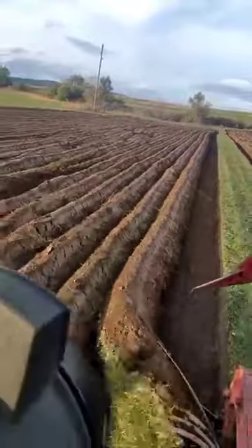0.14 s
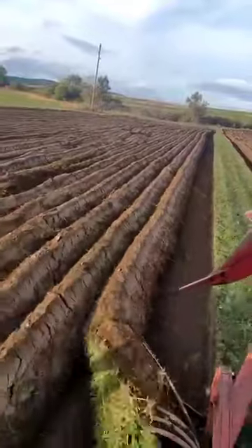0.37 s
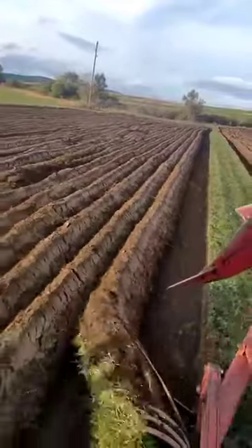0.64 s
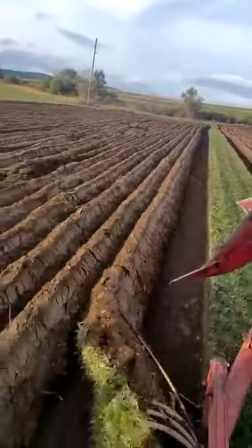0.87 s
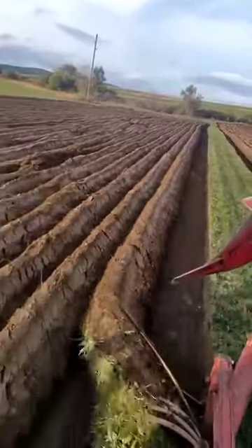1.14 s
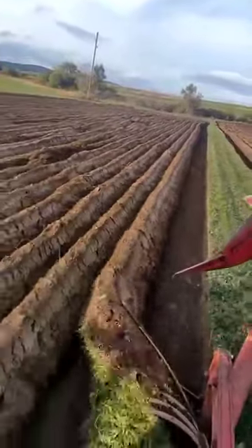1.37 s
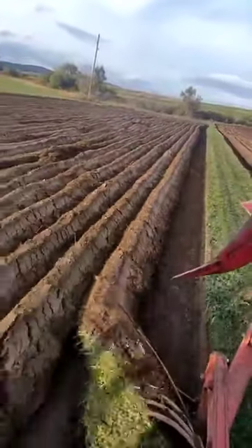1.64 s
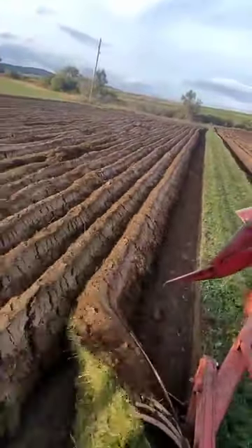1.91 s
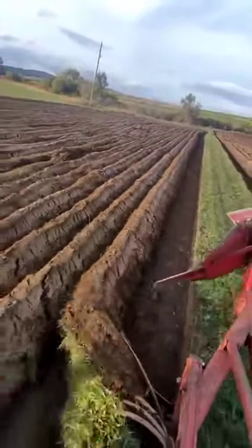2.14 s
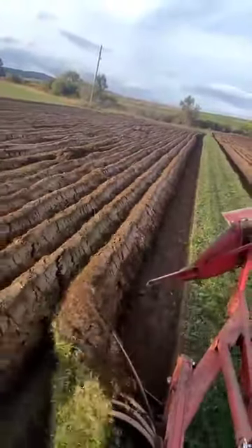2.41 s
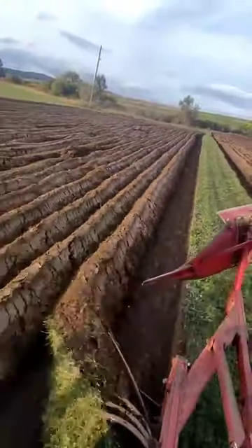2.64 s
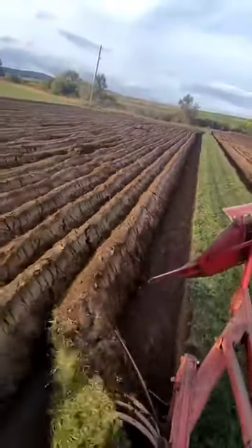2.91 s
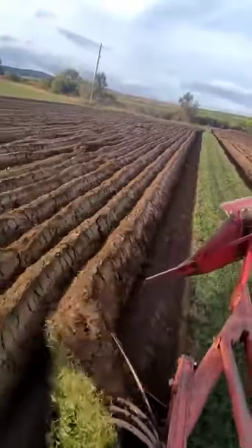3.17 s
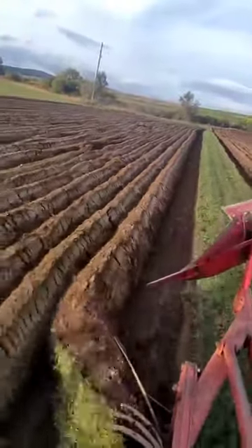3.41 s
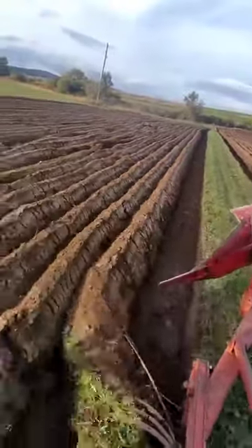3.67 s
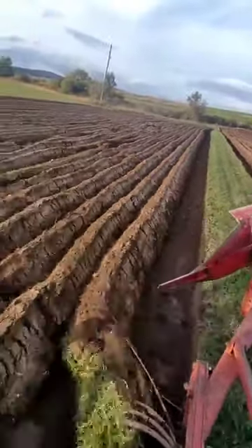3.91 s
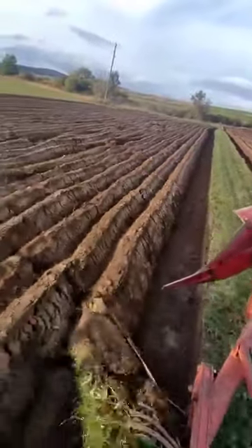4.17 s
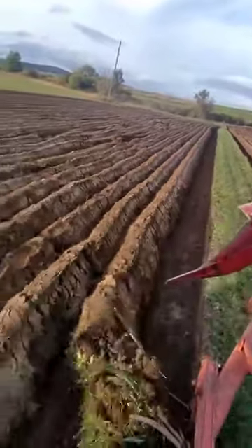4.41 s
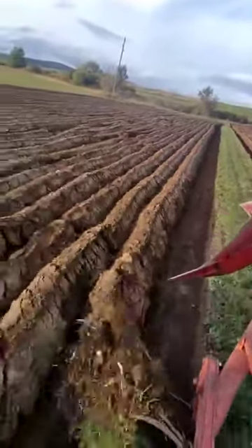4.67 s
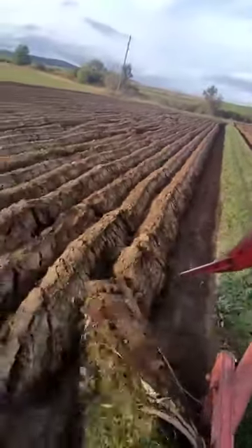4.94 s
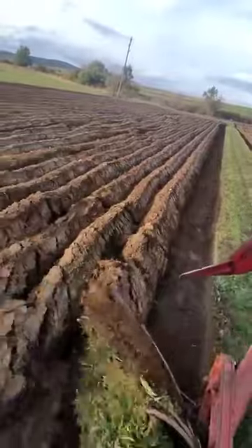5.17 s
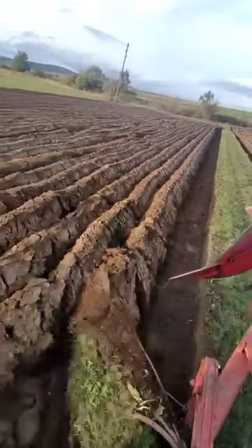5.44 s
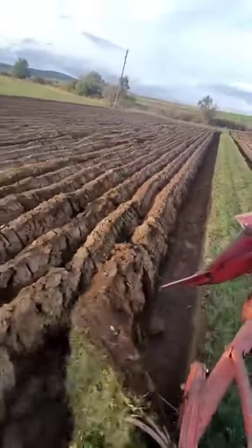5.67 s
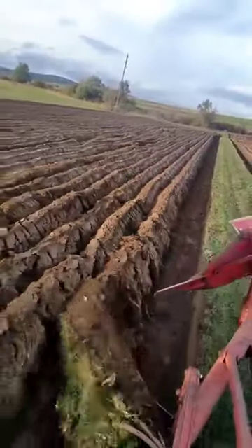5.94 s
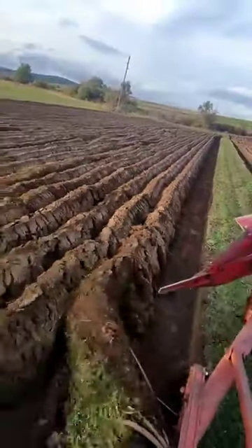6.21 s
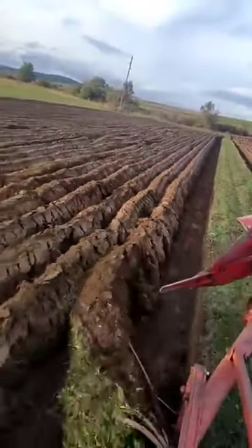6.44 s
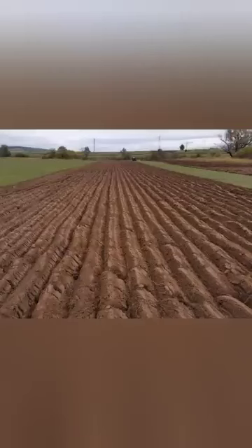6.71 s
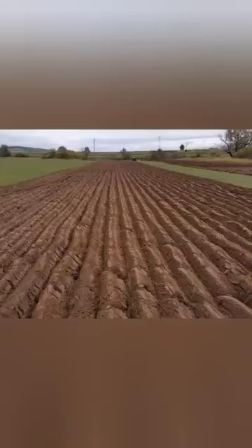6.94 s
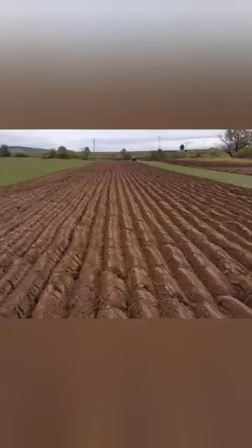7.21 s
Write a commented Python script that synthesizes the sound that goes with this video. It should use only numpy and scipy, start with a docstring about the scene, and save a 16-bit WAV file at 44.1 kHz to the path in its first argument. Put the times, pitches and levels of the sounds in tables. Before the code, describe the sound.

Close on board a tractor pulling a plough across an open field, a three-cylinder diesel runs at constant fast speed with a deep, even throb and repeating clatter. Gear whine wavers on top, valve knocks ring thin metal, and a loose sheet rattles in uneven bursts. Fan air, tyres and turning soil blend into dense, wide stereo rushing. Near the end the sound cuts instantly to silence.

```python
"""At the driver's seat of a three-cylinder diesel tractor, pulling a plough at steady load, heard at two ports.
The exhaust throbs and gears whine as tones locked to the crankshaft; the block repeats one clatter every cycle.
Short noise bursts knock on ringing tinwork, and resonated noise makes a loose sheet rattle in spells.
Patchy noise in three bands is the rush of fan air, tyres and turning soil, until the sound is cut off."""
import sys
import numpy as np
from scipy import signal
from scipy.fft import rfft, irfft, next_fast_len
from scipy.io import wavfile
from scipy.ndimage import uniform_filter1d, map_coordinates

SR = 44100
rng = np.random.default_rng(int(sys.argv[2]) if len(sys.argv) > 2 else 0)


def generate_wav(sig):
    """Save sig (samples, or channels by samples) to the path in sys.argv[1] as 16-bit PCM at SR."""
    pcm = np.round(np.clip(np.atleast_2d(sig).T, -1, 1) * 32767).astype(np.int16)
    wavfile.write(sys.argv[1], SR, pcm)


def convert_level_to_amplitude(level_db):
    """Map a level in decibels to its linear amplitude factor."""
    exponent = np.asarray(level_db, float) / 20
    return 10 ** exponent


N = 323253
LEFT_RIGHT = np.array([[1], [-1]])


def unit(x):
    """Scale each channel to rms 1."""
    return x / np.sqrt(np.mean(x ** 2, axis=-1, keepdims=True) + 1e-20)


def along(points, hz, column=1):
    """Read a column of a table over frequency, on a log axis."""
    rows = np.transpose(points)
    return np.interp(np.log(hz + 1), np.log(rows[0] + 1), rows[column])


def curves(rows):
    """Join the dots over time: one value per sample for each column after the time."""
    time_s, *columns = np.transpose(rows)
    return [np.interp(np.arange(N) / SR, time_s, column) for column in columns]


def wobble(knots_per_s):
    """A smooth random curve through normally distributed knots."""
    knots = rng.standard_normal(int(N * knots_per_s / SR) + 4)
    return map_coordinates(knots, [np.arange(N) * knots_per_s / SR])


def swell(events):
    """Bell-shaped rises in dB from rows of centre_s, half_length_s, rise_db."""
    t = np.arange(N) / SR
    return sum(rise_db * np.exp(-((t - centre_s) / half_s) ** 2) for centre_s, half_s, rise_db in events)


def tone(level_db, turns):
    """A cosine of the given rms level; turns is its phase in whole rounds."""
    return np.sqrt(2) * convert_level_to_amplitude(level_db) * np.cos(2 * np.pi * turns)


def filtered(x, response):
    """Filter x by a complex response of frequency, with room for the tail."""
    size = next_fast_len(N + SR // 2)
    hz = np.fft.rfftfreq(size, 1 / SR)
    return irfft(rfft(x, size) * response(hz), size)[..., :N]


def modes(table):
    """Causal response of resonances in alternating polarity: rows of centre_hz, width_hz, level_db."""
    def response(hz):
        total = 0
        for k, (centre_hz, width_hz, level_db) in enumerate(table):
            damping = 1j * hz * width_hz
            total = total + (-1) ** k * convert_level_to_amplitude(level_db) * damping / (centre_hz ** 2 - hz ** 2 + damping)
        return total
    return response


# how alike left and right are; columns: frequency_hz, likeness (0-1)
LIKENESS = [(30, .8), (80, .88), (200, 1), (300, 0.47), (420, 0.42), (650, 0.71), (800, 0.6), (950, 0.16),
            (1700, 0.31), (2200, 0.15), (3000, 0.03), (14000, 0)]


def paired(pair):
    """Mix two noises into a left and right of the set likeness; the left port hears the engine first."""
    lead_s = 0.0002296

    def mid_side(hz):
        angle = np.arccos(np.clip(along(LIKENESS, hz), -1, 1)) / 2
        return np.array([np.cos(angle), np.sin(angle)])

    def early_left(hz):
        return np.exp(1j * np.pi * lead_s * np.outer([1, -1], hz))

    mid, side = filtered(pair, mid_side)
    return filtered(np.array([mid + side, mid - side]), early_left)


# crankshaft speed; columns: time_s, speed_rev_per_min
CRANK_SPEED = [(0.0, 1797.5), (1.11, 1785.8), (1.86, 1797.1), (2.71, 1776.7), (3.02, 1781.3),
               (3.44, 1761.1), (3.75, 1804.5), (4.42, 1796.0), (5.18, 1775.3), (5.74, 1800.9),
               (6.14, 1787.7), (6.7, 1786.2)]


def crankshaft():
    """Running count of four-stroke cycles; each takes two turns of the crank."""
    return np.cumsum(curves(CRANK_SPEED)[0]) / 120 / SR


# harmonics of the exhaust pulse; columns: order (per four-stroke cycle), left_db, right_db (rms)
EXHAUST_ORDERS = [(3, -26, -27), (6, -15.5, -15), (9, -20.5, -19.5), (12, -28, -27.5)]


def exhaust(cycle):
    """Each firing draws one deep pressure dip; the top order comes early, from a panel ringing just above it."""
    first_pulse = .859  # place in the cycle (0-1)
    out = np.zeros((2, N))
    for order, *db in EXHAUST_ORDERS:
        early_turns = .19 * (order / 12) ** 6
        level_db = np.array(db)[:, None] + 0.38 * wobble(11)
        out -= tone(level_db, order * (cycle - first_pulse) + early_turns)
    return out


# strongest tones of block and frame; columns: order (per four-stroke cycle), left_db, right_db (rms)
BLOCK_ORDERS = [(2, -40, -40), (7, -33, -33), (11, -39, -38), (13, -34, -31), (14, -41, -38),
                (15, -38, -35), (18, -49, -39), (19, -48, -36), (20, -38, -41), (24, -40, -32),
                (25, -45, -34), (26, -49, -39), (27, -44, -40), (28, -39, -40), (30, -40, -44),
                (32, -39, -38), (36, -39, -44), (37, -38, -46), (46, -39, -47), (51, -42, -41),
                (55, -50, -41), (57, -40, -44), (94, -43, -55), (95, -44, -54)]
# typical level of the weaker orders that fill the cycle; columns: frequency_hz, level_db (rms per order)
BLOCK_FILL = [(60, -50.5), (150, -41), (400, -47), (900, -46.5), (1500, -53), (2500, -59), (3200, -77.5)]


def block(cycle, size=4096):
    """The same clatter returns every cycle, so every order sounds; bass reaches both ports nearly in step."""
    order = np.arange(size // 2 + 1)
    hz = order * np.mean(np.transpose(CRANK_SPEED)[1]) / 120
    above_fill = hz > BLOCK_FILL[-1][0]
    level_db = along(BLOCK_FILL, hz) - 200 * above_fill + 3.5 * rng.standard_normal((2, len(order)))
    for k, left_db, right_db in BLOCK_ORDERS:
        level_db[:, int(k)] = left_db, right_db
    # silence the lowest two orders, and those that belong to exhaust and gears
    level_db[:, [0, 1, 3, 6, 9, 12, 34, 42, 52, 68]] = -200
    shared = rng.random(len(order))
    own = rng.standard_normal((2, len(order)))
    turns = shared + .3 * own * (1 - np.clip(along(LIKENESS, hz), 0, 1))
    shapes = irfft(convert_level_to_amplitude(level_db) * np.exp(2j * np.pi * turns), size) * size / np.sqrt(2)
    place = np.arange(size) / size
    return np.array([np.interp(cycle % 1, place, shape, period=1) for shape in shapes])


# gear whine as the tooth load changes; columns: time_s, smallest_gear_db, largest_gear_db (before left-right lean)
GEAR_WHINE = [(0, -24.5, -35), (.45, -28, -37.5), (.85, -31, -33), (1.2, -30, -31.5), (1.6, -25, -34.5),
              (2.35, -27.5, -31), (2.8, -33.5, -36), (3.1, -34, -30.5), (3.5, -32.5, -43.5),
              (3.95, -27, -33.5), (4.75, -33, -33.5), (5.3, -25.5, -37.5), (5.9, -32, -31),
              (6.7, -30.5, -34.5)]


def gears(cycle):
    """Teeth meshing at crank speed; the smallest gear adds overtones, the middle one fades and wavers."""
    small_db, large_db = curves(GEAR_WHINE)
    surge = (5.97, .15, 11)  # the middle gear sings out once: centre_s, half_length_s, rise_db
    middle_db = -38.5 + 4 * wobble(3.5) + swell([surge])
    small, middle, large = 2 * np.array([17, 21, 26])  # teeth, two crank turns to a cycle
    parts = [  # order, level_db, lean_db (added left, taken from right), waver_turns
        (small, small_db, 2.0, 0),
        (2 * small, small_db - 8.2, 1.5, 0),
        (3 * small, small_db - 15, 1.2, 0),
        (middle, middle_db, .3, .3),
        (large, large_db, 1.2, 0)]
    out = np.zeros((2, N))
    for order, db, lean_db, waver_turns in parts:
        start_turns = rng.random() + 0.073 * LEFT_RIGHT
        level_db = db + lean_db * LEFT_RIGHT + wobble(12)
        waver = 0.039 * wobble(15) + waver_turns * wobble(4)
        out += tone(level_db, order * cycle + start_turns + waver)
    return out


# knocks in every cycle; columns: place (0-1 of a cycle), level_db (strength before the tinwork)
KNOCK_PLACES = [(.95, -8.5), (.72, -11), (.28, -16), (.05, -10)]
# the tinwork they ring; columns: centre_hz, width_hz, level_db (gain before left-right lean)
TINWORK = [(640, 60, -4.5), (1410, 59, 2), (1580, 90, -3), (1947, 110, 3.5), (2070, 70, -4.5),
           (2800, 120, -9), (4800, 140, -15.5)]


def knocks(cycle):
    """Knocks strike near set crank angles, never twice alike; their short bursts ring the tinwork."""
    count = int(cycle[-1]) - 1
    blows = np.zeros(N)
    for place, level_db in KNOCK_PLACES:
        timing, strength = rng.standard_normal((2, count))
        when = np.arange(count) + place + .012 * timing
        at = np.searchsorted(cycle, when).clip(0, N - 1)
        blows[at] += convert_level_to_amplitude(level_db + 4.6 * strength)
    burst = convert_level_to_amplitude(-60 * np.arange(SR // 20) / SR / .015)  # falls 60 dB in 15 ms
    shaken = signal.fftconvolve(blows, burst)[:N] * paired(rng.standard_normal((2, N)))
    return filtered(shaken, modes(TINWORK)) * convert_level_to_amplitude(1.5 * LEFT_RIGHT)


def patchy(depth_db, bins, frames, ring_db):
    """Two noises, strong in short patches and in narrow, lasting bands where bodywork rings."""
    spectra = signal.stft(rng.standard_normal((2, N)), nperseg=1024)[2]
    short, lasting = rng.standard_normal((2, *spectra.shape[1:]))
    short = uniform_filter1d(uniform_filter1d(short, bins, 0), frames, 1)
    lasting = uniform_filter1d(lasting, size=60, axis=1)
    field_db = depth_db * short / short.std() + ring_db * lasting / lasting.std()
    return signal.istft(spectra * convert_level_to_amplitude(field_db), nperseg=1024)[1][:, :N]


# colour of the rush, relative within each band; columns: frequency_hz, left_db, right_db (per Hz)
RUSH_COLOUR = [(25, -54, -60.5), (60, -55, -56.5), (100, -48, -52), (150.5, -49.5, -50.5), (204, -42, -42),
               (250, -54, -49), (326, -52.5, -48), (500, -47.5, -52.5), (754, -50.5, -52.5),
               (1050, -53.5, -53), (1200, -57.5, -59.5), (1380, -52.5, -55), (2000, -53.5, -58),
               (2610, -57, -58.5), (3480, -62.5, -63), (5600, -67.5, -66.5), (7200, -68.5, -63.5),
               (8780, -67.5, -58.5), (9970, -64, -67.5), (12100, -68, -74), (13630, -72.5, -76),
               (14200, -84, -86)]


def rush(cycle):
    """Boom of the panels, body of engine and soil, hiss of the fan; the hiss breathes with the firings."""
    def band(pair, low_hz, high_hz):
        def response(hz):
            split = 1 / np.sqrt((1 + (low_hz / (hz + 1)) ** 6) * (1 + (hz / high_hz) ** 6))
            return split * convert_level_to_amplitude([along(RUSH_COLOUR, hz, column=1), along(RUSH_COLOUR, hz, column=2)])
        both = filtered(paired(pair), response)
        return both / np.sqrt(np.mean(both ** 2))

    jolt_db = 0.91 * wobble(20)
    # one cylinder rasps harder
    stroke_db = 1.1 * np.cos(2 * np.pi * (cycle - .92)) + .5 * np.cos(4 * np.pi * (cycle - .75))
    breath_db = 0.29 * np.cos(6 * np.pi * cycle) + .15 * np.cos(2 * np.pi * (cycle - .97))
    # mean level, slow drift, then quicker movement
    boom_db = -23.5 + 1.3 * wobble(2.99) + 1.2 * wobble(12)
    body_db = -19.5 + 0.3 * wobble(3.07) + jolt_db + stroke_db
    hiss_db = -25 + 0.27 * wobble(3) + 0.49 * jolt_db + breath_db
    boom = convert_level_to_amplitude(boom_db) * band(patchy(1.7, bins=2, frames=5, ring_db=1.1), 14, 260)
    body = convert_level_to_amplitude(body_db) * band(patchy(2.15, bins=3, frames=3, ring_db=2.5), 260, 3500)
    hiss = convert_level_to_amplitude(hiss_db) * band(patchy(1.92, bins=5, frames=4, ring_db=1.5), 3500, 20000)
    return boom + body + hiss


# resonances of the loose sheet; columns: centre_hz, width_hz, level_db (relative)
SHEET_MODES = [(1374, 40, -3), (2392, 80, -0.5)]
# stronger spells of rattling; columns: centre_s, half_length_s, rise_db (above the rest)
RATTLE_SPELLS = [(.85, 0.12, 9), (1.15, 0.074, 5.5), (2.7, .3, 4.5), (3.27, .1, 7.5), (4.3, 0.65, 3.5),
                 (5.0, 0.25, 7.5), (5.8, .3, 5), (6.42, .12, 5.5)]


def rattle():
    """The loose sheet chatters in uneven spells as the frame jolts over the soil: unsteady noise, resonated."""
    rest_db = -40  # between spells
    chatter = convert_level_to_amplitude(4.0 * wobble(25) + 2.4 * wobble(7)) * rng.standard_normal((3, N))
    shared, own = chatter[:1], chatter[1:]
    heard = filtered(shared + 0.97 * own, modes(SHEET_MODES))
    return convert_level_to_amplitude(rest_db + swell(RATTLE_SPELLS)) * unit(heard)


def scene():
    """Exhaust, block, gears and knocks follow the crank, body and hiss pulse with it, boom and sheet run free."""
    cycle = crankshaft()
    return exhaust(cycle) + block(cycle) + gears(cycle) + knocks(cycle) + rush(cycle) + rattle()


def top_cut(x):
    """Nothing passes above the cut-off."""
    return signal.sosfilt(signal.butter(12, 14510, fs=SR, output="sos"), x)


def record(dry):
    """Peaks round off near full scale; then the sound stops within two milliseconds."""
    cut_s, fade_s = 6.689, .002
    soft = dry / (1 + np.abs(dry / 1.05) ** 5) ** (1 / 5)
    on = np.clip((cut_s - np.arange(N) / SR) / fade_s, 0, 1)
    return top_cut(soft * on)


dry = scene()
out = record(dry)
generate_wav(out)
```